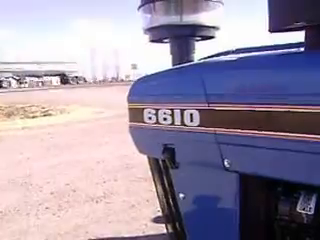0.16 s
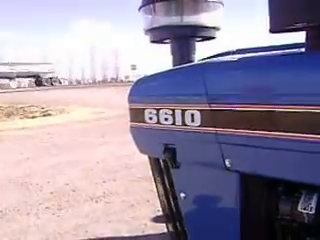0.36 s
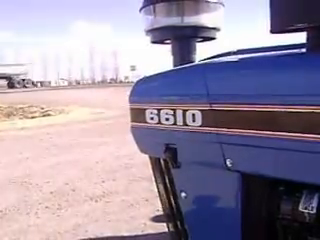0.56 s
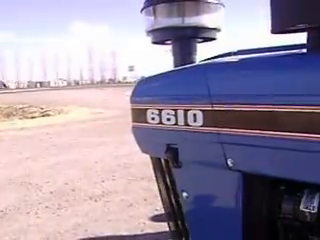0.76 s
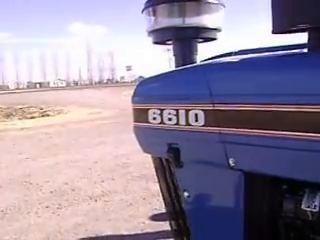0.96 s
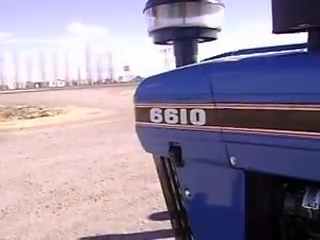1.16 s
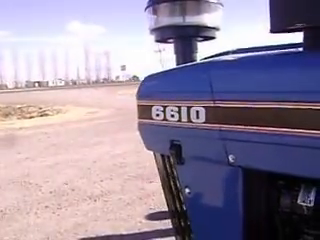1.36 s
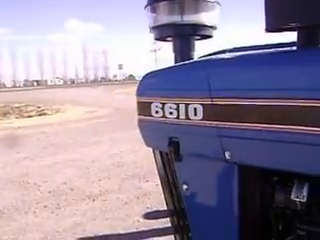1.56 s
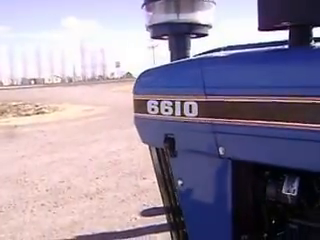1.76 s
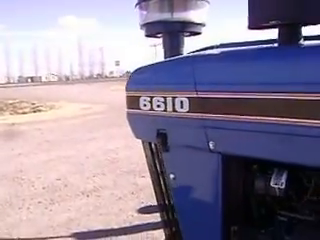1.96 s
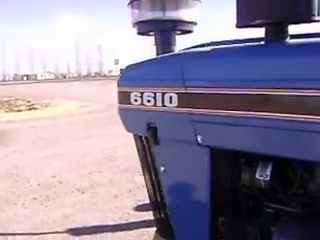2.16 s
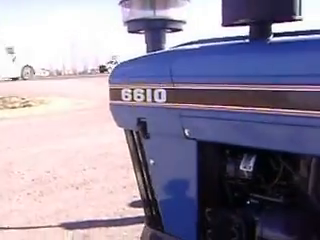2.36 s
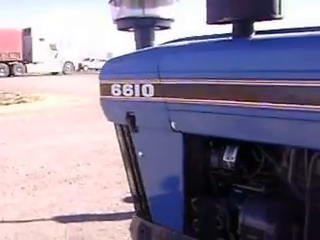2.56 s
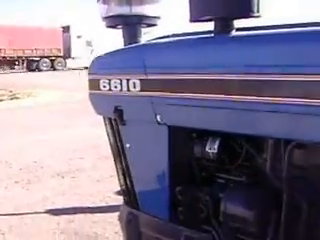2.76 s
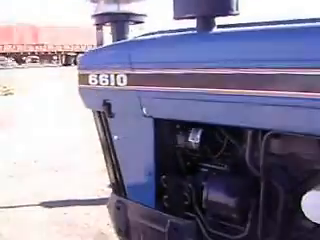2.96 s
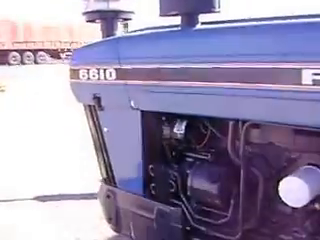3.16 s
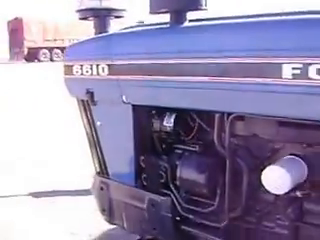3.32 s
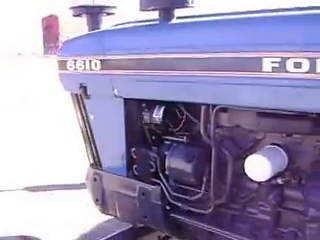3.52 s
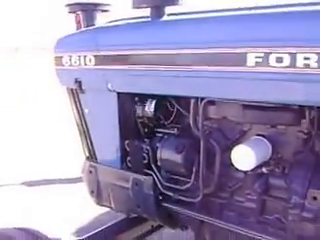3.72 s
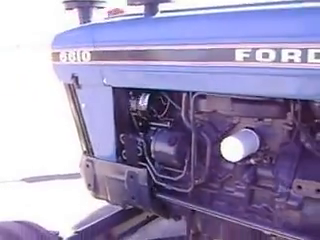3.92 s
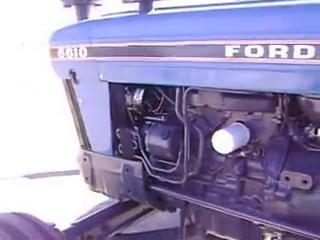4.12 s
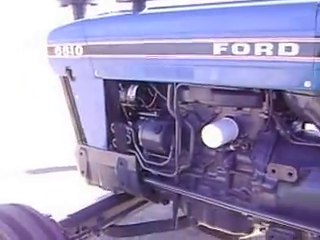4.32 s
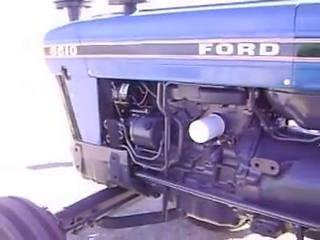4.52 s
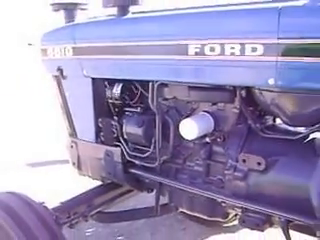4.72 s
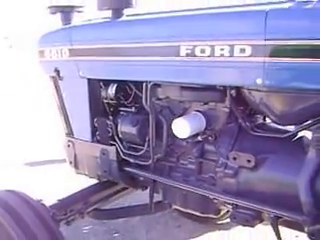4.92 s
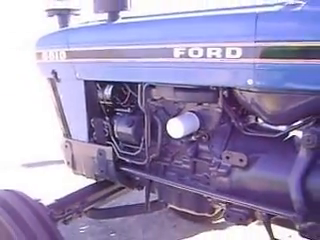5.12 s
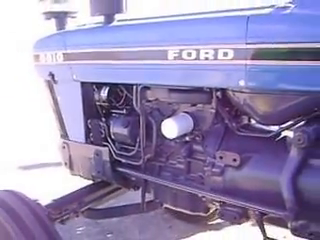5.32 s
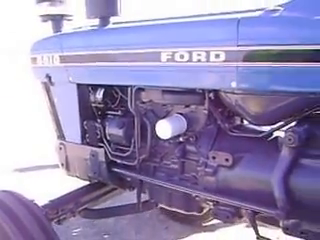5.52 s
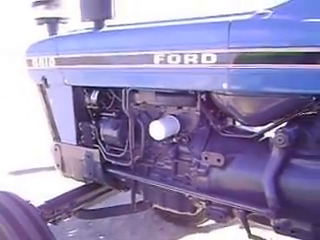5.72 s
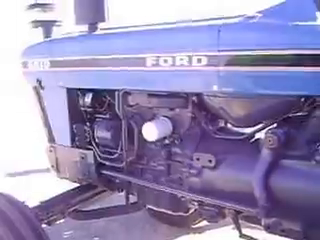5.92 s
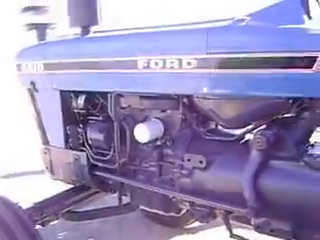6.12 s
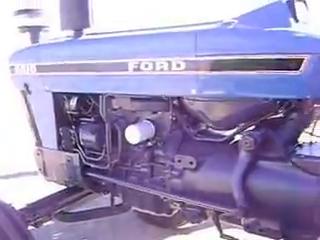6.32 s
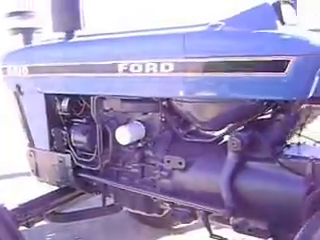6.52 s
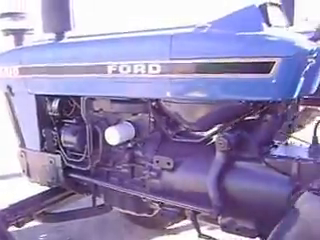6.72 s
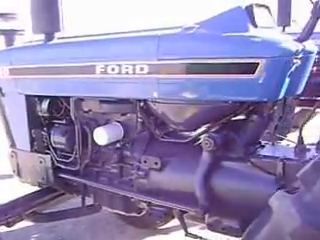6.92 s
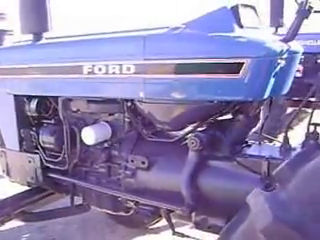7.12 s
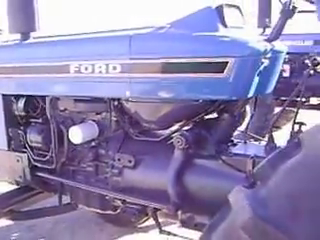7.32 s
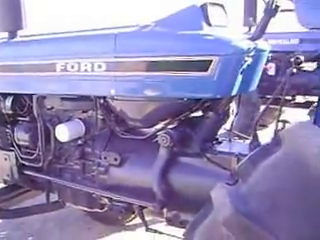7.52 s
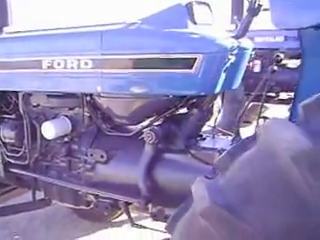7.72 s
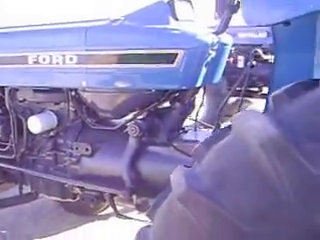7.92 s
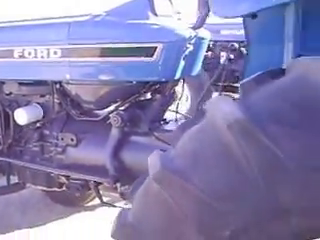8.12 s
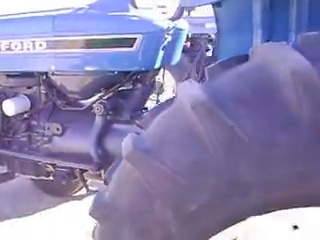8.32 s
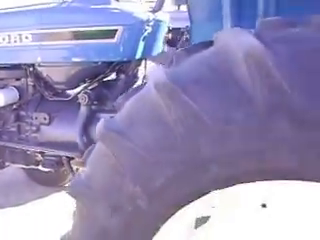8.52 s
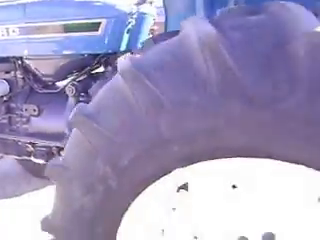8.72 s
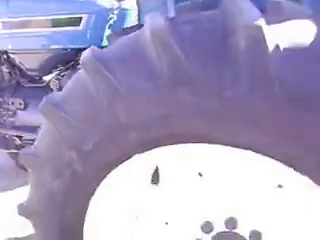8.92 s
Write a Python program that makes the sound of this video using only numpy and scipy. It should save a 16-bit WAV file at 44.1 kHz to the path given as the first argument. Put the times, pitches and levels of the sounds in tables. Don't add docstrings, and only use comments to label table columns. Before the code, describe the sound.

Loud truck pass-by with tyre roar, exhaust hum and whining gears, then receding, with gravelly footsteps and raspy overloaded low-grade camera sound.

```python
import sys
import numpy as np
from scipy import signal
from scipy.io import wavfile

SR = 44100
rng = np.random.default_rng(int(sys.argv[2]) if len(sys.argv) > 2 else 0)


def int16_out(signal):
    q = np.round(np.clip(np.atleast_2d(signal).T, -1, 1) * 32767)
    wavfile.write(sys.argv[1], SR, q.astype(np.int16))


def boost(x):
    u = np.asarray(x, float) / 20
    return 10 ** u


N = 399987

# t/s, f/Hz
FIRING_RATE = [(0.0, 95.0), (0.8, 94.85), (1.4, 93.03), (2.0, 90.63), (2.5, 88.24), (3.0, 87.37),
               (3.8, 86.96), (5.0, 85.7), (6.0, 85.56), (9.07, 85)]
# t/s, tyre roar level/dB, hiss over roar/dB, exhaust level/dB
LORRY_LEVELS = [(0.0, -15, -5.5, -20.5), (.3, -15, -5, -21), (.9, -14, -7, -18), (1.45, -12, -9, -15),
                (2.09, -10.5, -11, -15.5), (2.45, -9.5, -12, -15.5), (2.72, -12, -9.5, -14.5),
                (3.18, -6.5, -4.5, -15), (3.58, -9, -4, -15.5), (3.74, -14.5, -5.5, -18),
                (4.45, -17.5, -4, -18.5), (5.33, -15.5, -9.5, -24), (5.58, -22, -9.5, -28),
                (6.29, -20.5, -10.5, -25.5), (6.92, -23.5, -10.5, -25.5), (7.8, -26, -17.5, -26),
                (8.3, -30, -9.5, -26.5), (9.07, -25.5, -17.5, -25.5)]
# t/s, order, gain/dB, duration/s
ORDER_BEATS = [(0.0, 1, -5, 0.036), (1.14, 1, -2, 0.046), (4.056, 1, -2.5, 0.086), (4.47, 1, -3, .08),
               (5.049, 1, -5, 0.18), (5.457, 1, 0.5, 0.04), (6.435, 1, -5, 0.044), (6.74, 1, -3, 0.039),
               (7.363, 1, 2, .12), (.1, 2, -12, 0.16), (1.033, 2, -18, 0.073), (1.341, 2, -16.5, 0.096),
               (1.596, 2, -3.5, 0.094), (1.83, 2, -10.5, 0.084), (2.65, 2, -4.5, 0.078),
               (2.866, 2, 1, 0.063), (4.471, 2, -0.5, 0.067), (5.056, 2, 2.5, 0.12), (5.252, 2, 0, 0.039),
               (6.44, 2, -10, .04), (6.53, 2, 4, .05), (6.764, 2, -10, .08), (8.162, 2, 5, 0.068),
               (8.75, 2, 6, 0.24)]
# multiple of firing rate, peak t/s, duration/s, level/dB, width/Hz
WHINE_LINES = [(4.413, 1.3, 0.89, -22.5, 9.6), (4.366, 2.35, 0.3, -20, 2.1), (4.335, 3.33, 0.33, -16.5, 13),
               (4.343, 4.6, .9, -25, 4.7), (5.415, 3.1, 0.17, -17.5, 4.4), (5.33, 4.7, 0.6, -24.5, 2.4),
               (5.394, 6.0, 0.5, -31, 1.3), (3.385, 1.53, 1, -19.5, 24), (3.33, 4.8, 0.54, -26, 12),
               (2.702, 1.9, 0.45, -21.5, 22), (8.86, 1.9, .48, -15.5, 45), (7.91, 3.45, 0.3, -19, 35),
               (7.89, 4.05, .4, -20, 35), (6.87, 0.42, 0.11, -25.5, 2.4), (6.425, 0.13, 0.18, -22.5, 52),
               (6.37, 2.95, 0.1, -20.5, 30), (18.57, 0.38, .3, -32.5, 13), (23.32, 1.9, .7, -31, 130)]
# f/Hz, density/(dB per Hz)
APPROACH_SPECTRUM = [(90, -11.5), (180, -6), (310, -5), (520, -9), (810, -4.5), (1100, -10), (1500, -23),
                     (2050, -16.5), (2600, -27.5), (3100, -22), (4000, -33), (5400, -32)]
# f/Hz, density/(dB per Hz)
RECEDING_SPECTRUM = [(90, -7.5), (166, -7), (290, -7), (560, -10.5), (800, -6.5), (1300, -21.5),
                     (1700, -23.5), (2200, -26), (3000, -35.5), (4000, -42.5), (5400, -48.5)]
# t/s, roar gain/dB, hiss gain/dB, duration/s
PATH_SURGES = [
    (2.364, 0.3, 6, 0.059),
    (2.656, 1.5, 4, .1),
    (3.398, -0.8, -2.5, 0.089),
    (4.223, 4.5, -6.5, .12),
    (4.617, 6, 0, .08),
    (5.08, 0.5, 2, 0.14),
    (5.17, 0.5, -6.5, 0.074),
    (7.498, 2.5, -4.5, 0.22),
    (7.741, 5.5, 1, 0.12),
    (8.037, 5, -2, 0.1),
]
# t/s, peak level/dB, f/Hz, t60/s
STONE_TICKS = [(0.7716, 2.5, 2790, 0.014), (4.8947, -12.5, 1900, 0.02), (5.98, -13, 2630, 0.0082),
               (7.083, -15.5, 2500, 0.014), (7.147, -20, 4370, 0.012), (7.3861, -34, 2520, 0.01),
               (7.4798, -24, 3230, 0.012), (8.1994, -29, 2503, 0.01), (8.2223, -24, 2660, 0.0093),
               (8.7989, -34, 2790, 0.012), (9.0319, -27, 3070, 0.013)]
# t/s, peak level/dB, f/Hz, t60/s
NEAR_SNAP = (3.2442, 3.5, 4900, .04)
# t/s, peak level/dB, f/Hz, rise/s
HEEL_KNOCKS = [
    (0.772, 2.5, 842, 0.0045),
    (1.593, 1, 785, 0.0072),
    (1.88, 1, 270, 0.0029),
    (4.189, -6, 161, 0.005),
    (4.349, -2, 674, 0.0052),
    (5.039, -4, 178, 0.0036),
    (6.456, -15, 118, 0.01),
    (7.94, -10.5, 420, 0.0073),
    (8.157, -7, 157.2, 0.0051),
    (8.491, -5.5, 300, 0.0027),
]
# t/s, rumble level/dB, duration/s, grit over rumble/dB
SHOE_SCUFFS = [(3.45, -9, 0.32, -24), (3.95, -20.5, 0.34, -28.5), (4.399, -13, 0.051, -23.5),
               (4.562, -17.5, 0.087, -32.5), (4.802, -15.5, 0.085, -30), (5.006, -21, 0.066, -30),
               (5.25, -19.5, 0.26, -30), (5.51, -24, 0.041, -25.5), (5.638, -28.5, 0.022, -23),
               (5.846, -20, .014, -12), (6.0, -24.5, 0.089, -27), (6.112, -23, 0.053, -24),
               (6.256, -32, .08, -23), (6.505, -25, 0.13, -23), (6.659, -26, .025, -27),
               (7.273, -24, 0.049, -28), (6.855, -26.5, 0.07, -22), (7.012, -23, .022, -24),
               (7.134, -21, .04, -18), (7.395, -20.5, 0.059, -34), (7.594, -17.5, 0.057, -30),
               (7.719, -17.5, 0.034, -30), (7.806, -32.5, .018, -26), (7.905, -23, 0.016, -31),
               (7.998, -24.5, 0.041, -33), (8.195, -27.5, .06, -26), (8.492, -27.5, .022, -29),
               (8.813, -24, 0.028, -24), (8.93, -24.5, 0.054, -26), (9.03, -30, .013, -26)]
# f/Hz, width/Hz, level/dB
SOLE_MODES = [(340, 200, -2), (443, 330, 2.5), (620, 650, -6), (950, 320, -18.5)]
# t/s, peak level/dB, duration/s
WIND_GUSTS = [(0.0, -22, 0.02), (0.16, -33, 0.029), (0.27, -36, .03), (1.06, -31, .1), (1.295, -24, 0.076),
              (1.494, -29, .07), (1.664, -24, 0.055), (1.925, -28.5, .08), (2.198, -24.5, .06),
              (2.46, -35, 0.056), (2.7, -29, .12), (2.92, -15, 0.046), (3.175, -17.5, 0.11),
              (3.471, -24, 0.078), (3.68, -25, .08), (3.88, -28, 0.095), (4.223, -19, 0.051),
              (4.474, -22.5, 0.097), (4.69, -23, 0.038), (4.825, -21, 0.016), (4.952, -19, .022),
              (5.038, -16, 0.017), (5.13, -25, .025), (5.38, -28.5, 0.086), (7.602, -36, .3),
              (6.5, -30, .08), (.6, -38.5, .2), (8.166, -36, 0.07), (8.503, -33, 0.035), (9.05, -27, 0.043)]


def engine(phase_rad):
    near_db, hidden_db, hidden_at_s, hiding_s = -1, -13.5, 5.9, 0.04
    exhaust_db = in_time(LORRY_LEVELS)[2]
    t_s, order, gain_db, duration_s = np.transpose(ORDER_BEATS)
    hidden = crossing(hidden_at_s, hiding_s)
    first_db = exhaust_db + swells(t_s, gain_db * (order < 1.5), duration_s)
    second_db = exhaust_db + swells(t_s, gain_db * (order > 1.5), duration_s)
    second_db = second_db + (1 - hidden) * near_db + hidden * hidden_db
    waver_rad = 0.25 * drift(4)
    first = boost(first_db + 2.5 + 0.5 * drift(1.3)) * np.sin(phase_rad)
    second = boost(second_db + 2.0 + 1.3 * drift(7.3)) * np.sin(2 * phase_rad + waver_rad)
    return first + second


def whines(phase_rad):
    steady_hz = 160.0
    out, t_s = np.zeros(N), np.arange(N) / SR
    for multiple, peak_s, duration_s, level_db, width_hz in WHINE_LINES:
        swell = boost(level_db) * np.exp(-0.5 * ((t_s - peak_s) / duration_s) ** 2)
        in_phase = np.sqrt(steady_hz / width_hz) + drift(width_hz)
        line = in_phase * np.sin(multiple * phase_rad)
        line = line + drift(width_hz) * np.cos(multiple * phase_rad)
        out += swell * rms_one(line)
    return out


def tyres(patchy_db=1.0, shared_db=0.5):
    turn_away_s, turn_lasts_s = 2.974, 0.29
    surge_fall = 0.26
    t_s, roar_gain_db, hiss_gain_db, duration_s = np.transpose(PATH_SURGES)
    roar_db, hiss_db, _ = in_time(LORRY_LEVELS)
    roar_db = roar_db + swells(t_s, roar_gain_db, duration_s, surge_fall)
    hiss_db = hiss_db + swells(t_s, hiss_gain_db, duration_s, surge_fall)
    away = crossing(turn_away_s, turn_lasts_s)
    together = drift(20)
    white = rng.standard_normal((2, N))
    edges_hz = 90 * 2 ** np.arange(0, 6.1, 0.2)
    out = 0
    for k, (low_hz, high_hz) in enumerate(zip(edges_hz, edges_hz[1:])):
        hz = np.sqrt(low_hz * high_hz)
        colour_db = (1 - away) * at_hz(APPROACH_SPECTRUM, hz) + away * at_hz(RECEDING_SPECTRUM, hz)
        bright_db = np.clip(np.log2(hz / 900), 0, 1) * (hiss_db + 10.5)
        flutter_db = patchy_db * drift(1.7) + shared_db * together
        out = out + boost(colour_db + bright_db + flutter_db) * band(white[k % 2], low_hz, high_hz)
    return boost(roar_db + 19.5) * out


def taps():
    out, t_s = np.zeros(N + SR), np.arange(SR // 10) / SR
    for at_s, level_db, hz, t60_s in [*STONE_TICKS, NEAR_SNAP]:
        decay = boost(-60 * t_s / max(t60_s, 0.003))
        crack = resonance(rng.standard_normal(len(t_s)), hz, 1500) * decay
        out[round(at_s * SR):][:len(t_s)] += boost(level_db) * crack / np.abs(crack).max()
    for at_s, level_db, hz, rise_s in HEEL_KNOCKS:
        puff = rms_one(band(rng.standard_normal(len(t_s)), 400, 780))
        push = np.sin(2 * np.pi * hz * t_s) + 0.62 * puff
        envelope = t_s / rise_s * np.exp(1 - t_s / rise_s)
        out[round(at_s * SR):][:len(t_s)] += boost(level_db - 10.0) * push * envelope
    return out[:N]


def gravel(per_s=2500.0, spread_db=5.0):
    shuffle_db, shuffle_grit_db, walk_from_s = -35.0, -13.5, 3.4
    t_s, level_db, duration_s, grit_db = np.transpose(SHOE_SCUFFS)
    press = boost(shuffle_db) + swells(t_s, boost(level_db), duration_s)
    grind = boost(shuffle_db + shuffle_grit_db) + swells(t_s, boost(level_db + grit_db), duration_s)
    walking = np.clip((np.arange(N) / SR - walk_from_s) / 0.08, 0, 1)
    sizes = boost(spread_db * np.minimum(rng.exponential(1, N), 4)) * rng.choice([-1, 1], N)
    slips = sizes * (rng.random(N) < per_s * boost(4.0 * drift(60)) / SR)
    grit = rms_one(band(slips, 2500, 6600))
    thuds = band(slips, 300, 1300)
    sole = rms_one(sum(boost(db) * resonance(thuds, hz, width_hz) for hz, width_hz, db in SOLE_MODES))
    return walking * boost(-5.0) * (press * sole + grind * grit)


def wind():
    breeze_db = -38
    low_pass = signal.butter(1, 60, fs=SR, output="sos")
    rumble = signal.sosfilt(low_pass, band(rng.standard_normal(N), 22, 260))
    t_s, level_db, duration_s = np.transpose(WIND_GUSTS)
    pressure = boost(breeze_db) + swells(t_s, boost(level_db), duration_s)
    return pressure * boost(2.0 + 2.4 * drift(22)) * rms_one(rumble)


def in_time(rows):
    t_s, *columns = np.transpose(rows)
    return [np.interp(np.arange(N) / SR, t_s, c) for c in columns]


def crossing(at_s, lasts_s):
    return 0.5 + 0.5 * np.tanh((np.arange(N) / SR - at_s) / lasts_s)


def swells(at_s, heights, lasts_s, fall=1):
    t_s = np.arange(0, N + 40, 40) / SR
    late_s = t_s[:, None] - at_s
    width_s = np.maximum(lasts_s * np.where(late_s > 0, fall, 1), 0.004)
    bells = np.exp(-0.5 * (late_s / width_s) ** 2)
    return np.interp(np.arange(N) / SR, t_s, bells @ heights)


def drift(rate_hz):
    r = np.exp(-80 * np.pi * rate_hz / SR)
    steps = rng.standard_normal(N // 40 + 2002)
    slow = signal.lfilter([1], [1, -2 * r, r * r], steps)[2000:]
    return np.interp(np.arange(N) / 40, np.arange(len(slow)), rms_one(slow))


def rms_one(x):
    return x / np.sqrt(np.mean(x ** 2) + 1e-20)


def band(x, low_hz, high_hz):
    return signal.sosfilt(signal.butter(2, [low_hz, high_hz], "band", fs=SR, output="sos"), x)


def resonance(x, hz, width_hz):
    r = np.exp(-np.pi * width_hz / SR)
    poles = [1, -2 * r * np.cos(2 * np.pi * hz / SR), r * r]
    return signal.lfilter([(1 - r * r) / 2, 0, (r * r - 1) / 2], poles, x)


def at_hz(points, hz):
    points_hz, level_db = np.transpose(points)
    return np.interp(np.log(hz), np.log(points_hz), level_db)


def scene():
    phase_rad = 2 * np.pi * np.cumsum(in_time(FIRING_RATE)[0]) / SR
    lorry = engine(phase_rad) + whines(phase_rad) + tyres()
    return (lorry + taps() + gravel() + wind())[None]


def roll_off(x):
    return signal.sosfilt(signal.butter(12, 15900, fs=SR, output="sos"), x)


def record(dry):
    stretch, stored_gap = 4, 7.1
    converter_top, overload, squeeze = 0.964, 0.978, 1200.0
    switch_on, switch_on_s = 0.5, 0.0002
    low_pass = signal.cheby2(10, 40, 5900, fs=SR, output="sos")
    heard = np.clip(signal.sosfilt(low_pass, dry[0]), -1, 1)
    read, ticks = np.arange(0, N, stored_gap), np.arange(0, N, stretch)
    stored = np.interp(read, np.arange(N), heard)
    logs = np.sign(stored) * np.log1p(squeeze * np.abs(stored))
    between = np.interp(ticks, read, logs)
    flips = np.abs(np.interp(ticks, read, np.sign(stored))) < 1
    stalled = np.sign(between) * np.expm1(np.abs(between)) / squeeze
    sparse = np.zeros(N)
    sparse[ticks] = stretch * converter_top * np.where(flips, stalled, heard[ticks])
    soft_edge = signal.firwin(65, SR / 8, window=("kaiser", 9.0), fs=SR)
    x = np.convolve(sparse, soft_edge, "same")[None]
    x = x + switch_on * np.exp(-np.arange(N) / SR / switch_on_s)
    x = np.clip(x, -overload, overload)
    return roll_off(x)


dry = scene()
out = record(dry)
int16_out(out)
```